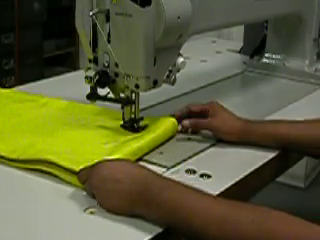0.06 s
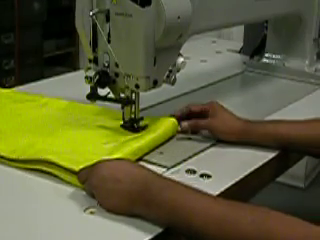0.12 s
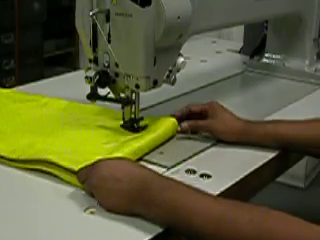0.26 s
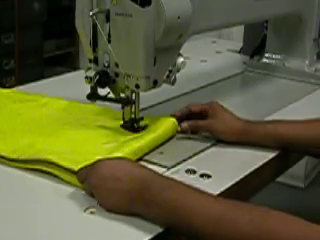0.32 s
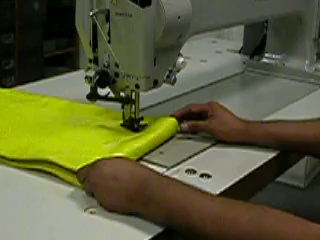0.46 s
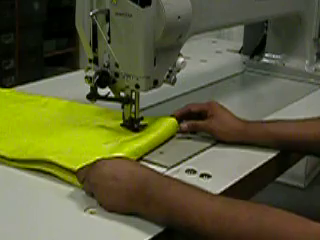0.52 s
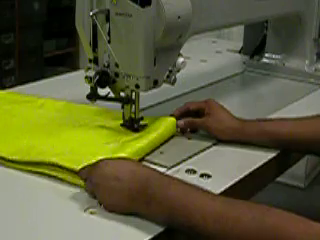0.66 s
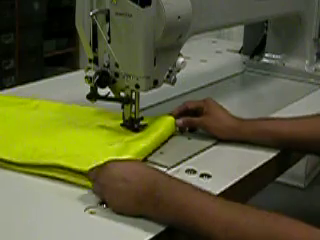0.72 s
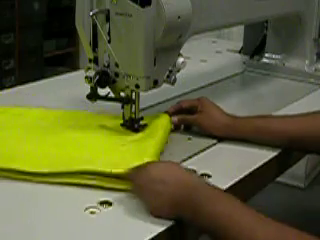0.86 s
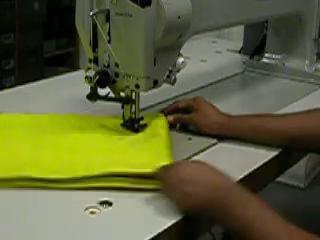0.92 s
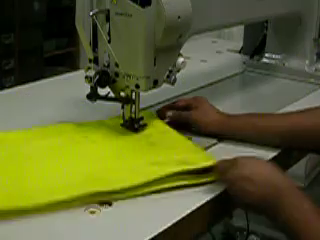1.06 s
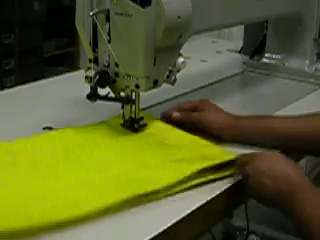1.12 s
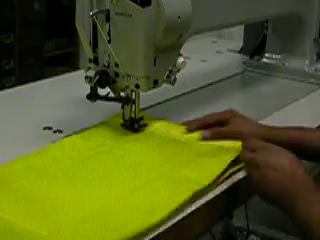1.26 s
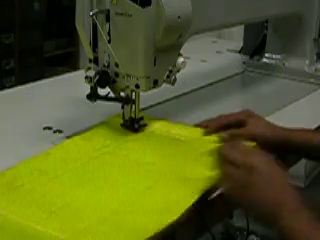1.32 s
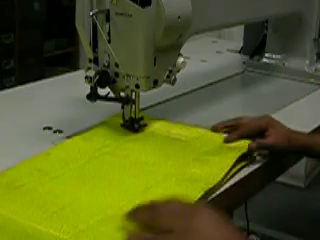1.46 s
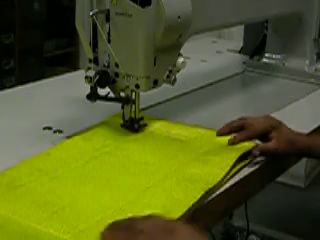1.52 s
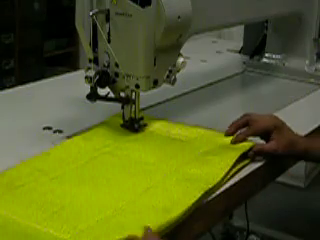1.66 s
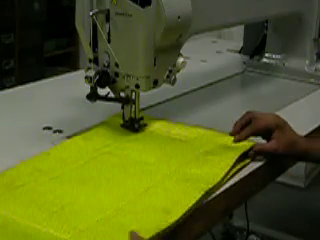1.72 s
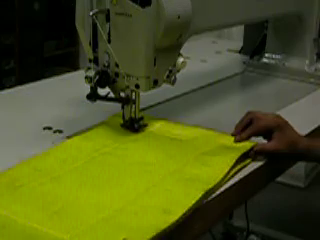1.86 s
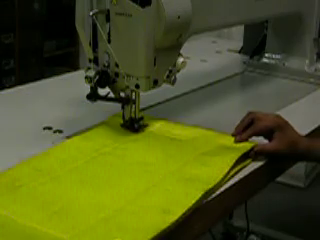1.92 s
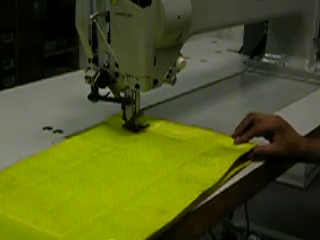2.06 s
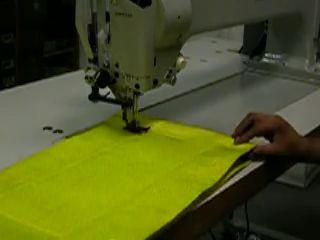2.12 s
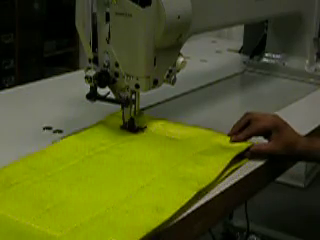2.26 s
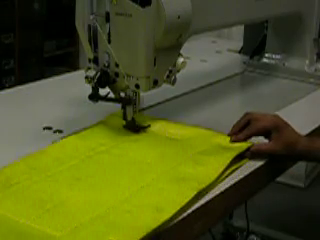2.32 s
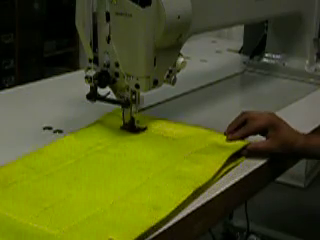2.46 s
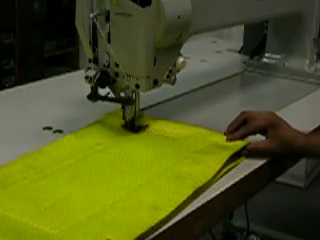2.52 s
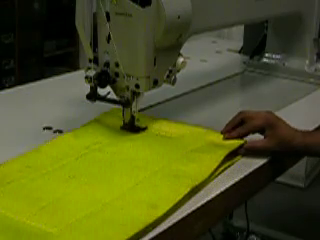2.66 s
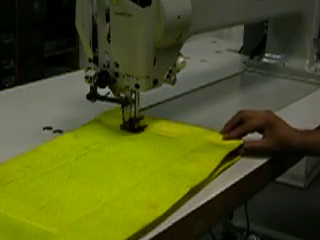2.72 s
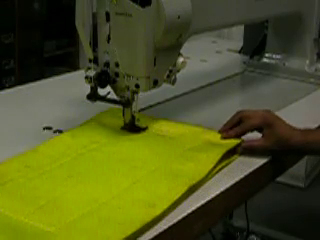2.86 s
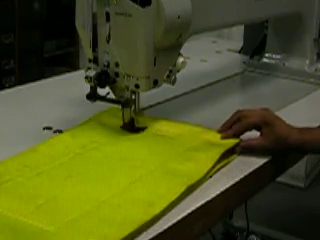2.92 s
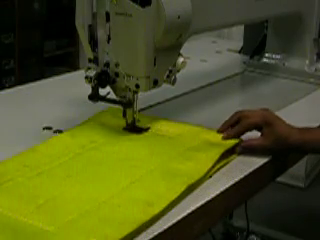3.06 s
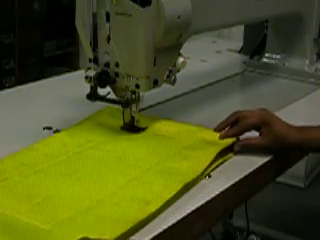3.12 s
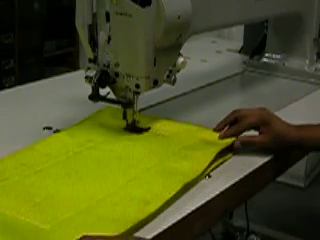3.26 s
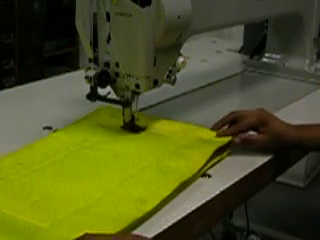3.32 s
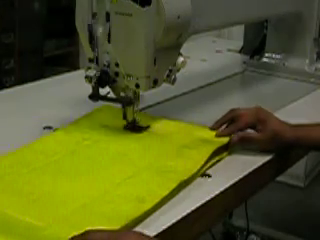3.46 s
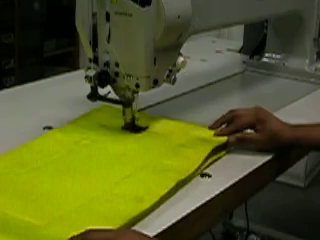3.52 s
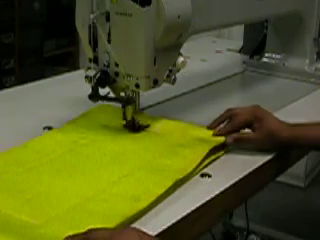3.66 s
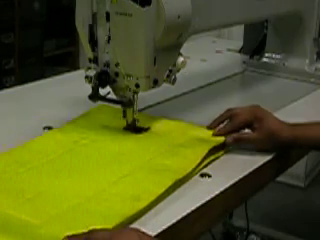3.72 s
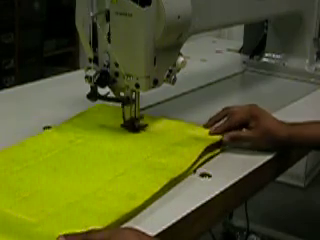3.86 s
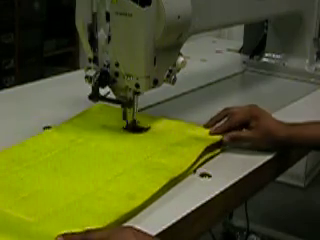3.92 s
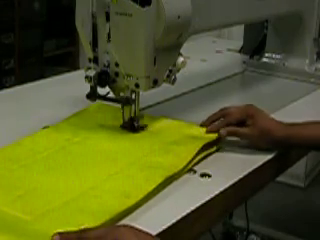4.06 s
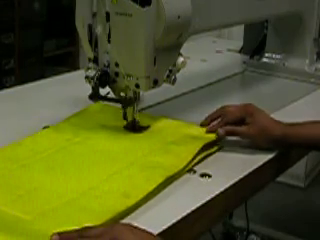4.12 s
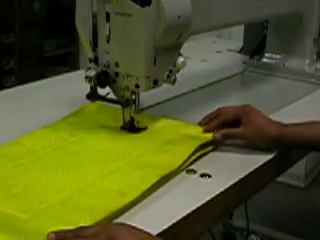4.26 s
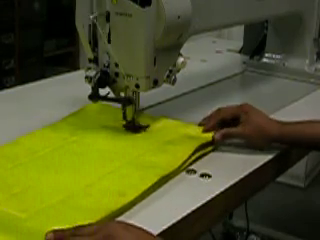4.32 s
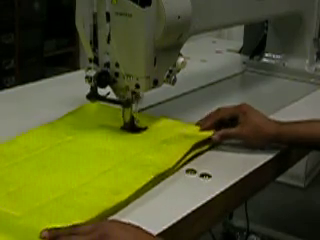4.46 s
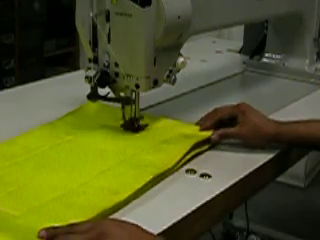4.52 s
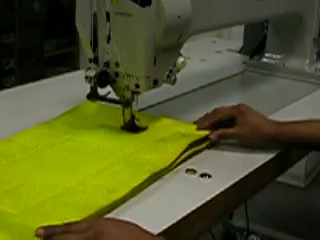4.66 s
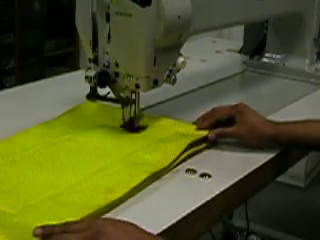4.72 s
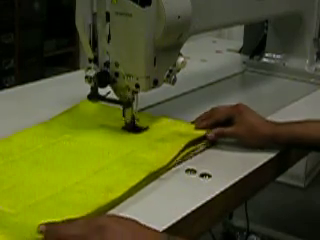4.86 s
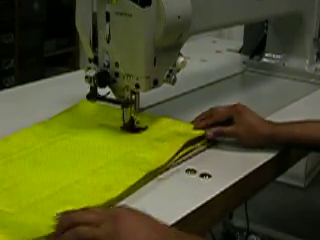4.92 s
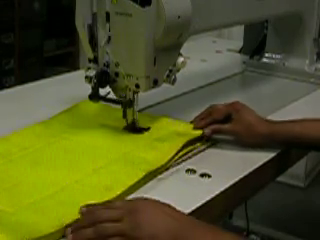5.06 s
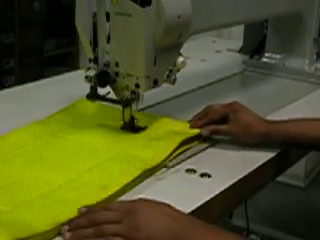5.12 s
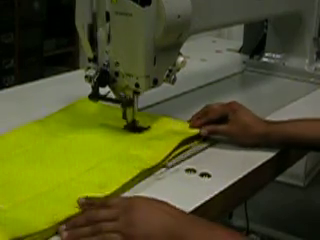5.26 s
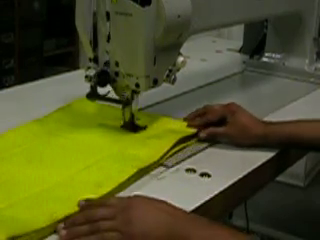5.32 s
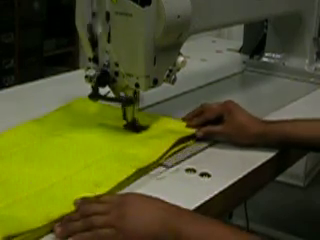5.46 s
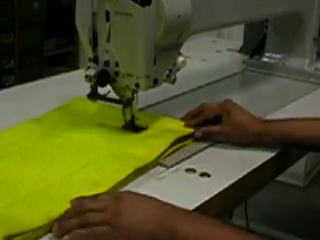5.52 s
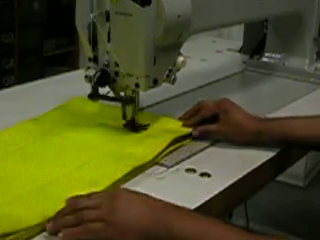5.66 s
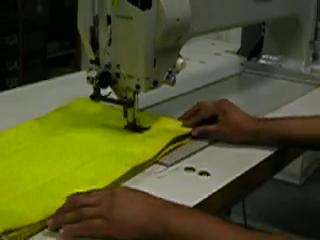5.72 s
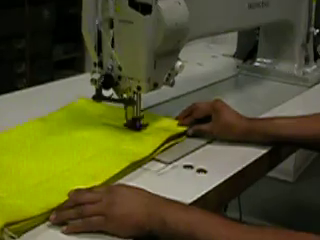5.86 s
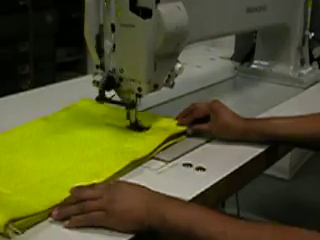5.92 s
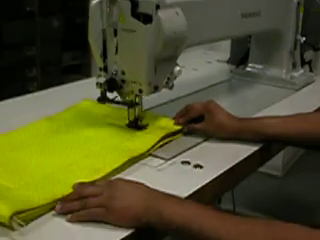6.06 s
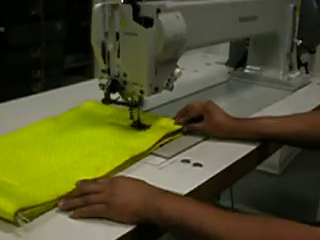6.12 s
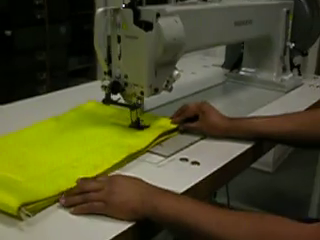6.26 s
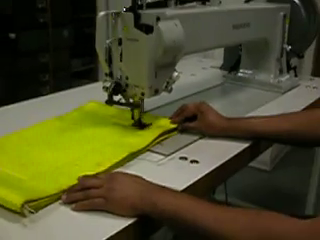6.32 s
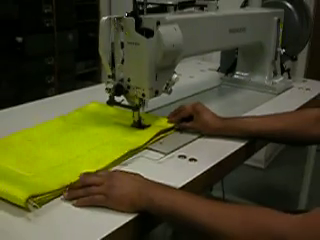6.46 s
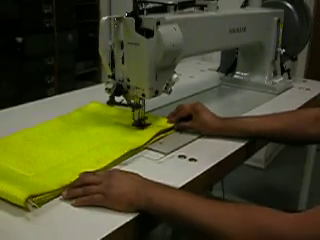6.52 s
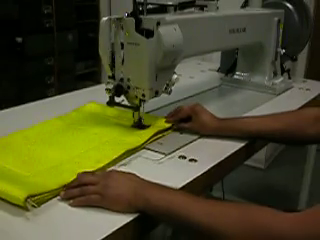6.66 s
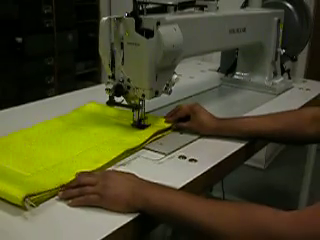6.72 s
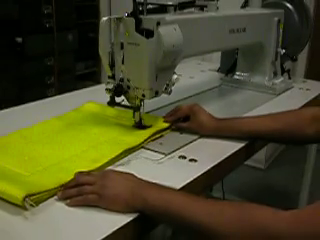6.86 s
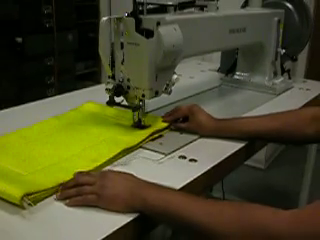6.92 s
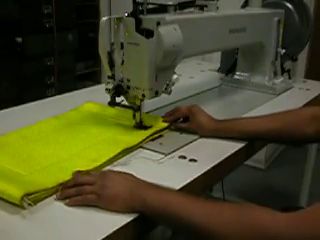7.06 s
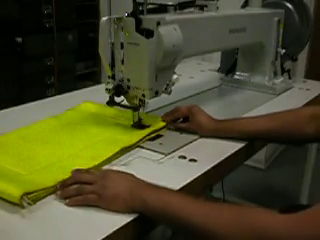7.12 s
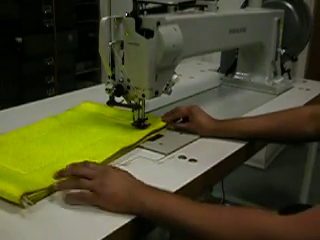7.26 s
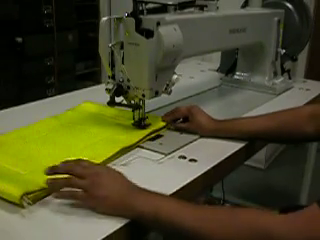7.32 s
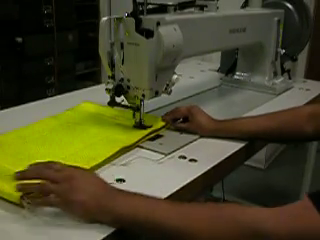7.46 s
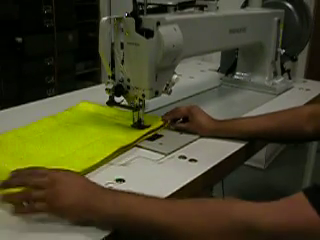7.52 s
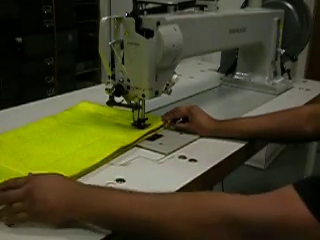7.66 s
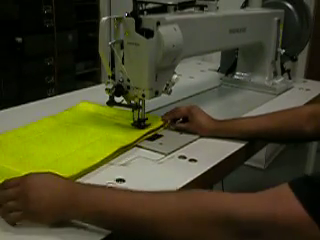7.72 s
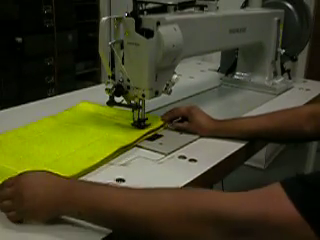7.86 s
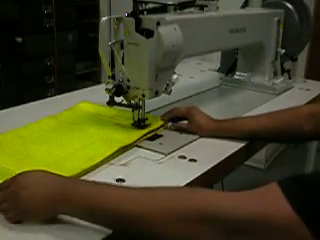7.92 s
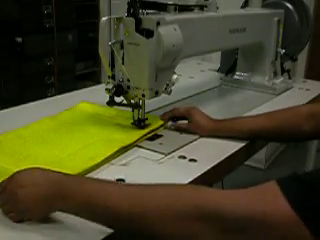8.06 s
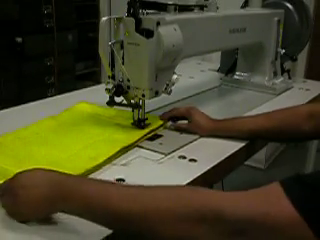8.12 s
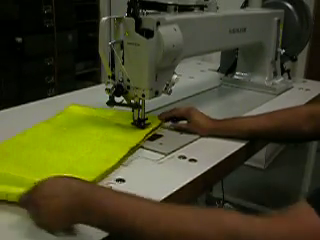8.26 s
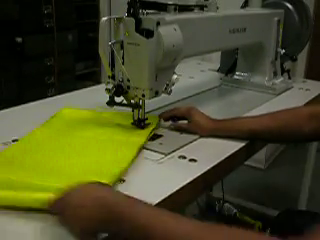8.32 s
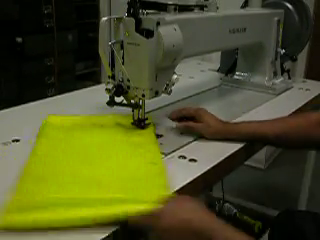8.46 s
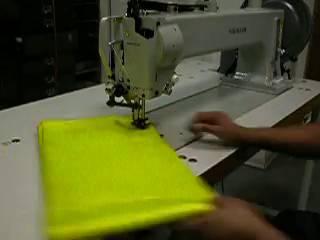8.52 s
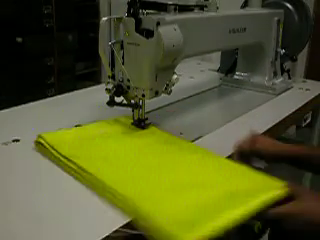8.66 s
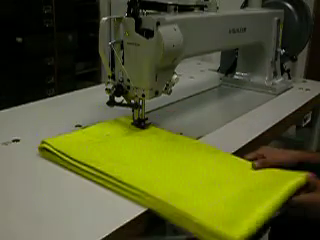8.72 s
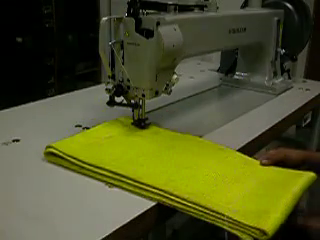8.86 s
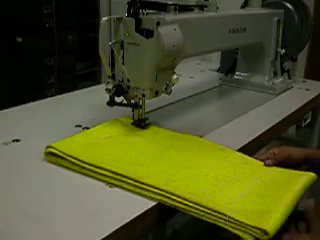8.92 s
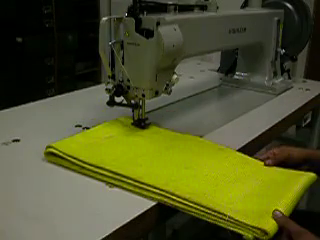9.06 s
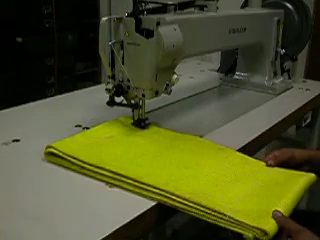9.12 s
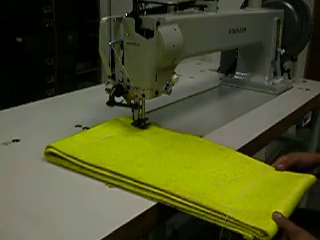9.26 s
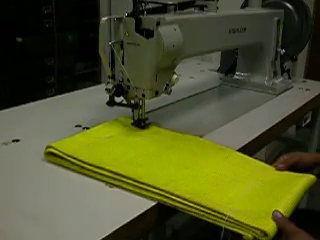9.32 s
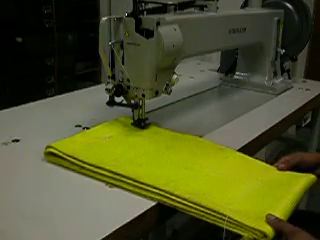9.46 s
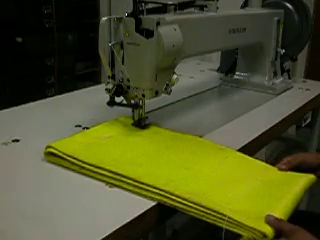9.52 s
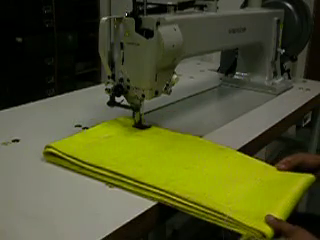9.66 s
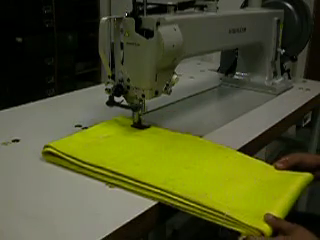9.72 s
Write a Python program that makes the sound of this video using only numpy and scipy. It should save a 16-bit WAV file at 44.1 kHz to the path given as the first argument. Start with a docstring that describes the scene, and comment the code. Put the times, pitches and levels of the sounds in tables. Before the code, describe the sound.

A heavy industrial sewing machine thumps out a steady five-second run of stitches, with air hisses, clunks and paired switch clicks before and after.

```python
"""A heavy walking-foot sewing machine stitches webbing in a workshop, about 4.5 stitches a second.
Each turn stamps the foot (struck modes) and rattles the linkage (noise bursts); gears, hook and thread
are filtered grains. An air cylinder lifts and drops the foot with a hiss (shaped noise) and a clunk.
A small switch clicks in pairs close by, sliding faces squeak, and the motor idles (noise and tones).
A narrow-band microphone channel overloads on the hardest blows."""
import sys
import numpy as np
from scipy import signal
from scipy.fft import rfft, irfft, next_fast_len
from scipy.io import wavfile
from scipy.ndimage import map_coordinates

SR = 44100
rng = np.random.default_rng(int(sys.argv[2]) if len(sys.argv) > 2 else 0)


def to_wav(s):
    """Save 16-bit WAV."""
    ch = np.atleast_2d(s).T  # columns
    pcm = np.round(np.clip(ch, -1, 1) * 32767)  # PCM
    wavfile.write(sys.argv[1], SR, pcm.astype(np.int16))


N = 431282

# Levels in all tables are relative; each source sets its own gain.
# linkage contacts in every turn: place_share_of_turn, thud_db, body_db, crack_db
LINKAGE_CONTACTS = [(.07, -21.5, -15, -25), (.105, -19.5, -20, -26.5), (.28, -22, -31, -30),
                    (.45, -28.5, -21, -28.5), (.71, -28, -21.5, -32.5)]
# stray knocks of the levers and needle bar, and ticks of the air valve just before the lifter moves (0.617 s,
# 9.389 s): start_s, level_db, crack_db
STRAY_KNOCKS = [(0.074, -5.5, -12), (0.162, -4.5, -15), (0.617, -20.5, 0), (0.911, -16, -10),
                (2.213, -17.5, -18), (2.25, -21.5, -9.5), (2.375, -22.5, -9), (2.594, -12.5, -2.5),
                (2.654, -6.5, -5.5), (4.664, -1.5, -6.5), (5.384, -5.5, -13.5), (5.583, -8.5, -7.5),
                (6.466, 1.5, -10), (7.39, -10, -9), (7.663, -12.5, -7.5), (7.94, -3.5, -17),
                (9.389, -8.5, -7)]
# modes of the frame: pitch_hz, level_db, t60_s
FRAME_MODES = [(505.7, -7.5, 0.37), (650, -19, 0.5), (1070, 9, 0.081), (1170, -1.5, .47), (1220, -5, 0.42),
               (1600, -16.5, 0.34), (1760, -14.5, .33), (2340, -17.5, .3), (3480, -14, 0.32),
               (3790, -17, 0.27)]
# spectrum of the switch: pitch_hz, level_db
SWITCH_SPECTRUM = [(180, -47.5), (300, -22), (429, -14), (594, -8.5), (813, -9), (1050, -1), (1560, -10.5),
                   (1850, -8.5), (2070, -9), (2770, -5), (3190, -17), (3750, -10), (4000, -8.5),
                   (5200, -41), (8800, -120)]
# resonances of the switch case: pitch_hz, width_hz, height_db
SWITCH_CASE_PEAKS = [(669, 58, 13.5), (1002, 59, 6), (1202, 74, 8.5), (1790, 84, 9.5), (2670, 320, 4.5)]
# modes of the foot on the needle plate: pitch_hz, level_db, t60_s
FOOT_MODES = [(878.6, 1.5, 0.035), (1029, -12.5, 0.092), (414.7, -18, .13)]
# resonances of the head and table: pitch_hz, width_hz, height_db
HEAD_PEAKS = [(298, 20, 8), (404, 30, 5.5), (506, 30, 7), (647.5, 26, 5), (920, 80, 2), (1046, 60, 3),
              (1160, 47, 1.5), (1976, 120, 5.5), (2420, 22, 1.5), (3350, 29, 6), (3300, 25, 1),
              (3700, 26, 1)]
# gear clatter spectrum: pitch_hz, density_db_per_hz
CLATTER_SPECTRUM = [(25, -22), (100, -17), (160, -8), (230, -10), (330, -5.5), (500, -1.5), (720, -2),
                    (900, 4.5), (1100, -1.5), (1350, -3), (1600, -10.5), (2500, -20.5), (4000, -23)]
# hook whirr spectrum: pitch_hz, density_db_per_hz
WHIRR_SPECTRUM = [(1000, -33), (1650, -4.5), (2000, 1), (2400, 5), (2700, -5), (3000, -15), (4000, -11.5)]
# thread rasp spectrum: pitch_hz, density_db_per_hz
RASP_SPECTRUM = [(1200, -23), (2300, -8.5), (2800, 3.5), (3150, -4), (3600, 0), (4200, -1)]
# low part of a blow: pitch_hz, density_db_per_hz
THUD_SPECTRUM = [(30, -15.5), (150, -15.5), (400, -1.5), (600, -2.5), (1000, -16), (3000, -52)]
# middle part of a blow: pitch_hz, density_db_per_hz
BODY_SPECTRUM = [(300, -37), (700, -17), (1000, -0.5), (1250, -8.5), (1600, -12), (3000, -37)]
# bright part of a blow: pitch_hz, density_db_per_hz
CRACK_SPECTRUM = [(700, -23.5), (1600, -3), (2500, -2), (3300, 1.5), (4200, -3)]
# air jet spectrum: pitch_hz, density_db_per_hz
HISS_SPECTRUM = [(26, -37), (45, -2.5), (144, -8), (273, -3.5), (348, -5), (517, -4), (623, -7.5),
                 (960, -2), (1400, -6.5), (2650, -1), (3130, -4), (3640, -1.5), (4000, 0.5), (5200, -43.5),
                 (8800, -120)]
# idling motor's rush: pitch_hz, density_db_per_hz
IDLE_SPECTRUM = [(30, -4), (110, -6), (200, -0.5), (290, 0), (450, -2), (800, -1.5), (1150, -3.5),
                 (1400, -8), (2200, -7), (3000, -9), (4000, -9.5)]
# idling motor's tones: pitch_hz, level_db
HUM_TONES = [(193.8, -56), (269.2, -54), (689.1, -52.5), (1136, -57.5), (1174, -61), (2132, -68)]
# reverberation of the workshop: pitch_hz, t60_s
WORKSHOP_DECAY = [(150, 0.56), (1000, 0.42), (4000, 0.18)]
# response of the microphone channel: pitch_hz, gain_db
MICROPHONE_RESPONSE = [(3750, 0), (3950, -4), (4100, -9.5), (4300, -20.5), (4500, -45), (4710, -88.5)]
# brief squeaks of the clutch and valve: start_s, pitch_hz, level_db
SQUEAK_NOTES = [(0.643, 1203, -16), (1.811, 3195, -27.5), (2.409, 2014, -27.5), (7.712, 3790, -36.5),
                (7.738, 2065, -36), (8.272, 3300, -27.5), (9.374, 3300, -26)]
# pedal runs: clutch_takes_s, first_stitch_s, brake_bites_s, drive_db, coasting_db_per_s
PEDAL_RUNS = [(0.0, 0.057, 0.179, -16, 224), (2.45, 2.549, 7.544, -18.7, 125),
              (7.761, 7.847, 7.991, -17.5, 330)]
# force of the stamp, following the thickness of the webbing: time_s, peak_db
STAMP_FORCE = [(0, -6.5), (2.55, -9), (3.4, -7), (4.3, -7.5), (5.45, -5), (5.9, -8), (6.8, -7),
               (7.45, -8.5), (7.85, -6)]
# pulls on the thread in each turn: from_share_of_turn, to_share_of_turn, rasp_db
THREAD_PULLS = [(0, 0.281, 1), (.46, 0.559, -3.5), (0.711, .82, -2)]
# the air cylinder raises the foot: valve_cracks_s, opens_s, shuts_s, air_db
FOOT_RAISES = [(0.643, 0.674, 0.82, -15.5), (8.275, 8.285, 8.425, -15.5)]
# it lowers the foot, which rings the frame: valve_cracks_s, opens_s, lands_s, air_db, ring_db
FOOT_DROPS = [(1.809, 1.842, 1.931, -12.5, -27), (9.376, 9.406, 9.494, -13.5, -18)]
# pairs of switch clicks: pressed_s, released_s, press_db, release_db, treble_db_per_octave
SWITCH_PRESSES = [(0.316, 0.379, -6.5, -3, -5), (0.516, 0.58, -3.5, -1.5, 0.5),
                  (2.063, 2.181, -9, -10, 2.5), (8.587, 8.659, -12.5, -11.5, 0),
                  (8.783, 8.866, -11.5, -9.5, -0.5), (8.99, 9.06, -7.5, -9.5, -4),
                  (9.192, 9.261, -0.5, -12, 0), (9.592, 9.667, -8, -8.5, -2.5)]
# thin sagging whines: start_s, length_s, pitch_hz, sag_hz_per_s, level_db
MOTOR_WHINES = [(8.52, .59, 2272, 265, -45.5), (9.29, .14, 2110, 39.8, -42)]

TURN_S = .2226  # one stitch at full speed
SPIN_UP_LAG_S, SPIN_UP_TURNS = .0135, 2.5  # time lost while gathering speed; turns it is spread over
# the noise comes in fast, a little low, then fills out
CLUTCH_DB_PER_S, SOFT_START_DB, SPIN_UP_S = 500.5, 5, 0.32
FIRST_STAMP_DB = -3.5  # in the first turn the foot and links move more slowly
LOAD_RISE = 0.053  # share of a turn in which the load builds before the stamp; it then ebbs
CLATTER_EBB_DB, WHIRR_EBB_DB = 4.5, 5.5  # fall of the load from one stamp to the next
# the feed stroke: place and width in shares of a turn, and the load it adds
FEED_PLACE, FEED_WIDTH, FEED_CLATTER_DB, FEED_WHIRR_DB = 0.46, .12, 1.5, 2
PULL_EDGE, SLACK_THREAD_DB = .08, -11  # fade of a pull (share of turn), rasp between pulls
# blows that come with each raise, drop and stop: level_db, thud_db, crack_db
RAISE_KICK, RAISE_STOP = (0, -13, -16), (-7, -10, -18.5)
DROP_KICK, DROP_LANDING = (-9.5, -7, -14.5), (4.5, -17.5, -10)
VALVE_TICK, BRAKE = (-19.5, -14, -6), (-4.5, -15, -8)
KNOCK_THUD_DB = -22.5
# the air line empties; below this pitch the jet rumbles only while the valve is open
EMPTY_S, PUFF_HZ = .19, 170
TOP_HZ = 15800  # upper limit of the channel after clipping


def amp(db):
    """Logarithmic level: decibels become a pressure ratio."""
    return 10 ** (np.asarray(db) / 20)


def unit(x):
    """Effective value: scale a signal to rms 1."""
    return x / np.sqrt(np.mean(x ** 2) + 1e-20)


def along(points, hz):
    """Logarithmic pitch scale: interpolate (Hz, value) points along it."""
    f, v = np.transpose(points)
    return np.interp(np.log(hz + 1), np.log(f + 1), v)


def clock(size=N):
    """Sampled time: the seconds at each sample."""
    return np.arange(size) / SR


def wobble(rate):
    """Slow random modulation: a smooth curve through rate random knots a second."""
    knots = rng.standard_normal(int(N * rate / SR) + 4)
    return map_coordinates(knots, [clock() * rate])


def add(track, s, sound):
    """Superposition: mix a sound into the track at s seconds."""
    start = int(np.clip(round(s * SR), 0, N))
    track[start:start + len(sound)] += sound[:N - start]


def colour(spectrum, peaks=(), size=8192):
    """Minimum phase: a causal impulse response of energy 1, with resonances on a broad spectrum."""
    hz = np.fft.rfftfreq(size, 1 / SR)
    resonances = sum(g / (1 + (2 * (hz - f) / w) ** 2) for f, w, g in peaks)
    db = along(spectrum, hz) + resonances
    db = np.maximum(db - np.maximum(hz - 4400, 0) / 30, -100)  # steep fall above 4.4 kHz
    # folding the cepstrum onto positive time makes the response causal
    cepstrum = irfft(np.log(amp(db)))
    fold = np.r_[1, np.full(size // 2 - 1, 2), np.zeros(size // 2)]
    h = irfft(np.exp(rfft(cepstrum * fold)))
    return h / np.linalg.norm(h)


def through(x, h):
    """Linear filtering: convolve a signal with an impulse response."""
    return signal.oaconvolve(x, h)[:N]


def grains(rate, scatter_db):
    """Shot noise: tiny random impacts, on average rate a second, at rms 1."""
    present = rng.random(N) < rate / SR
    sign = rng.choice([-1, 1], N)
    return unit(present * sign * amp(scatter_db * rng.uniform(-1, 1, N)))


def blow(h, t60, attack, size=6000):
    """Impact noise: decaying chatter excites a response; the first 10 ms set its scale."""
    t = clock(size)
    chatter = rng.standard_normal(size) * amp(-60 * t / t60) * (1 - np.exp(-t / attack))
    x = signal.fftconvolve(chatter, h)[:size]
    return x / x[:SR // 100].std()


def blow_responses():
    """Modal colouring: thud, body and crack bands, each heard through the head."""
    return [colour(band, HEAD_PEAKS) for band in (THUD_SPECTRUM, BODY_SPECTRUM, CRACK_SPECTRUM)]


def ring(modes, attack, scatter_db, detune, size=SR // 2):
    """Modal vibration: decaying sines, with strengths and pitches scattered anew for each blow."""
    t = clock(size)
    partials = np.zeros(size)
    for hz, db, t60 in modes:
        decay = amp(db + scatter_db * rng.normal() - 60 * t / t60)
        partials += decay * np.sin(2 * np.pi * hz * (1 + detune * rng.normal()) * t)
    return partials * (1 - np.exp(-t / attack))


def turns(first, brake):
    """Rotational inertia: stitch times settle to a steady beat as the shaft gathers speed."""
    k = np.arange(int((brake - first) / TURN_S) + 1)
    return first + k * TURN_S + SPIN_UP_LAG_S * (1 - np.exp(-k / SPIN_UP_TURNS))


def shaft():
    """Driven rotation: gain and place in the turn (0-1) as each run catches, fills out and coasts down."""
    t, drive, share = clock(), np.zeros(N), np.zeros(N)
    for clutch, first, brake, db, coast in PEDAL_RUNS:
        catch_db = CLUTCH_DB_PER_S * np.minimum(t - clutch, 0)
        soft_db = SOFT_START_DB * np.exp(-np.maximum(t - clutch, 0) / SPIN_UP_S)
        drive += amp(db + catch_db - soft_db - coast * np.maximum(t - brake, 0))
        stamps = turns(first, brake)
        marks = np.r_[first - TURN_S, stamps, stamps[-1] + TURN_S]
        share += np.interp(t, marks, np.arange(len(marks)))
    return drive, share % 1


def thread_rasp_db(share):
    """Friction under tension: the rasp rises with each pull, and the strongest pull counts."""
    pulls = []
    for start, end, db in THREAD_PULLS:
        places = [start - PULL_EDGE, start, end, end + PULL_EDGE]
        levels = [SLACK_THREAD_DB, db, db, SLACK_THREAD_DB]
        pulls.append(np.interp(share, places, levels, period=1))
    return np.max(pulls, axis=0)


def mechanism():
    """Load-modulated contact noise: gears and hook peak at stamp and feed; thread rasps when pulled."""
    drive, share = shaft()
    load = np.maximum(1 - share / (1 - LOAD_RISE), 1 - (1 - share) / LOAD_RISE) - .5
    feed = np.exp(-((share - FEED_PLACE) / FEED_WIDTH) ** 2)
    clatter_db = CLATTER_EBB_DB * load + FEED_CLATTER_DB * feed - 4.0
    whirr_db = WHIRR_EBB_DB * load + FEED_WHIRR_DB * feed - 8.0
    rasp_db = thread_rasp_db(share) - 11.0
    clatter_gain = amp(clatter_db + .9 * wobble(45))
    clatter = clatter_gain * through(grains(1200, scatter_db=2.5), colour(CLATTER_SPECTRUM, HEAD_PEAKS))
    whirr_gain = amp(whirr_db + .9 * wobble(35))
    whirr = whirr_gain * through(grains(2500, scatter_db=6.5), colour(WHIRR_SPECTRUM, HEAD_PEAKS))
    rasp_gain = amp(rasp_db + 1.8 * wobble(30))
    rasp = rasp_gain * through(grains(900, scatter_db=2.0), colour(RASP_SPECTRUM, HEAD_PEAKS))
    return drive * (clatter + whirr + rasp)


def motor():
    """Broadband and tonal radiation: a soft rush, faint tones and a thin whine that sags in pitch."""
    t = clock()
    rush_gain = amp(-42.0 + 0.39 * wobble(17))
    rush = rush_gain * through(rng.standard_normal(N), colour(IDLE_SPECTRUM))
    hum = np.zeros(N)
    for hz, db in HUM_TONES:
        hum += amp(db - 1.5 + 2.5 * wobble(5)) * np.sin(2 * np.pi * hz * t + 2.5 * wobble(13))
    whine, flutter = np.zeros(N), .4 * wobble(60)  # flutter in radians
    for s, length, hz, sag, db in MOTOR_WHINES:
        age = clock(int(length * SR))
        phase = 2 * np.pi * np.cumsum(hz - sag * age) / SR + flutter[:len(age)]
        add(whine, s, amp(db) * signal.windows.tukey(len(age), .45) * np.sin(phase))
    return rush + hum + whine


def stitches():
    """Periodic impact: the foot stamps once a turn; links take up their play at set places in it."""
    out = np.zeros(N)
    responses = blow_responses()
    _, body, crack = responses
    for _, first, brake, _, _ in PEDAL_RUNS:
        for k, s in enumerate(turns(first, brake)):
            slow_db = FIRST_STAMP_DB * (k == 0)
            db = np.interp(s, *np.transpose(STAMP_FORCE)) + slow_db
            stamp = ring(FOOT_MODES, attack=.0025, scatter_db=.8, detune=.028)
            add(out, s - .002, amp(db + 7.5) * stamp)
            add(out, s - .003, amp(db - 14.0 + rng.normal()) * blow(crack, t60=0.088, attack=0.0011))
            add(out, s, amp(db - 18.5) * blow(body, t60=.05, attack=0.00052))
            for share, *levels in LINKAGE_CONTACTS:
                contact = 0
                for level, h in zip(levels, responses):
                    gain = amp(level - 5.5 + 2 * rng.normal())
                    contact = contact + gain * blow(h, t60=0.031, attack=0.00061)
                when = s + share * TURN_S + .001 * rng.normal()
                add(out, when, (when < brake) * amp(slow_db) * contact)  # silent once the brake bites
    return out


def knocks():
    """Arrested motion: lifter, brake and levers strike their stops; a landing foot rings the frame."""
    out = np.zeros(N)
    thud, body, crack = blow_responses()
    hits = [(brake, *BRAKE) for _, _, brake, _, _ in PEDAL_RUNS]
    lifter = ((FOOT_RAISES, RAISE_KICK, RAISE_STOP), (FOOT_DROPS, DROP_KICK, DROP_LANDING))
    for moves, kick, stop in lifter:
        for cracks, opens, ends, *_ in moves:
            hits += [(cracks, *VALVE_TICK), (opens, *kick), (ends, *stop)]
    hits += [(s, db, KNOCK_THUD_DB, crack_db) for s, db, crack_db in STRAY_KNOCKS]
    for s, db, thud_db, crack_db in hits:
        add(out, s, amp(db - 12.5) * blow(body, t60=.055, attack=.001))
        add(out, s, amp(db + thud_db - 6) * blow(thud, t60=0.098, attack=0.0018))
        add(out, s, amp(db + crack_db - 9.5) * blow(crack, t60=0.045, attack=0.00038))
    for _, _, lands, _, ring_db in FOOT_DROPS:
        add(out, lands, amp(ring_db) * ring(FRAME_MODES, attack=0.0017, scatter_db=1.5, detune=.002))
    return out


def switch():
    """Snap action: the spring creaks over, snaps and chatters in its resonant plastic case."""
    out, t = np.zeros(N), clock(size=2000)
    lead = .008  # seconds of creak before the snap
    for pressed, released, press_db, release_db, treble_db in SWITCH_PRESSES:
        # the treble tilt spans one octave from 1400 Hz, then stays level
        tilted = [(hz, level + treble_db * np.clip(np.log2(hz / 1400), 0, 1))
                  for hz, level in SWITCH_SPECTRUM]
        case = colour(tilted, SWITCH_CASE_PEAKS)
        for s, db in ((pressed, press_db), (released, release_db)):
            chatter_db = np.where(t < lead, 2200 * (t - lead) - 3, -1450 * (t - lead))
            chatter = rng.standard_normal(len(t)) * amp(chatter_db)
            snap = amp(20) * signal.unit_impulse(len(t), round(lead * SR))
            click = signal.fftconvolve(chatter + snap, case)
            add(out, s - lead + 0.00082, amp(db + 13.0) * click / np.linalg.norm(click))
    return out


def air():
    """Turbulent jet noise: the valve leaks, the piston thumps, air blows, then the line empties thinly."""
    t, flow, valve, piston = clock(), np.zeros(N), np.zeros(N), np.zeros(N)
    rise = .005  # seconds
    levels_db = [-50, -17.5, -10, 0, -1.5, -60]  # leak starts, leaks, leaks more, open, held, empty
    for cracks, opens, shuts, db, *_ in FOOT_RAISES + FOOT_DROPS:
        times = [cracks - rise, cracks, opens - rise, opens, shuts + rise, shuts + EMPTY_S]
        flow += amp(db + np.interp(t, times, levels_db, left=-120, right=-120))
        valve += np.interp(t, [cracks, opens, shuts - rise, shuts + rise], [0, 1, 1, 0])
        thump = blow(colour(THUD_SPECTRUM), t60=0.087, attack=0.0027)
        add(piston, opens - rise / 2, amp(-17.5) * thump)
    # the grains are the rattle of the lifter in the jet
    jet = unit(rng.standard_normal(N) + .5 * grains(700, scatter_db=6))
    full = through(jet, colour(HISS_SPECTRUM))
    highpass = signal.butter(2, PUFF_HZ, "high", fs=SR, output="sos")
    thin = signal.sosfiltfilt(highpass, full)
    return piston + flow * amp(1.4 * wobble(90)) * (thin + valve * (full - thin))


def squeaks():
    """Stick-slip friction: sliding faces catch for a moment and sing one rough note."""
    out = np.zeros(N)
    t = clock(size=900)
    swell = signal.windows.tukey(len(t), .25) * amp(-250 * t)
    for s, hz, db in SQUEAK_NOTES:
        slip = np.cumsum(rng.standard_normal(len(t))) * .1  # random walk of the phase
        add(out, s - .002, amp(db + 2.5) * swell * np.sin(2 * np.pi * hz * t + slip))
    return out


def workshop(x):
    """Reverberation: a delayed noise tail answers the sound, its treble dying first."""
    hz, t, z = signal.stft(rng.standard_normal(SR // 2), SR, nperseg=256)
    decay = amp(-60 * t / along(WORKSHOP_DECAY, hz)[:, None])
    tail = signal.istft(z * decay, SR, nperseg=256)[1]
    return through(x, np.r_[np.zeros(SR // 200), tail / np.linalg.norm(tail)])  # 5 ms delay


def scene():
    """Direct and reverberant field: the machine fills the room; the near switch is almost dry."""
    machine = mechanism() + stitches() + knocks() + air() + squeaks()
    clicks = switch()
    room = workshop(amp(-11) * machine + amp(-33.5) * clicks)
    return (machine + clicks + room + motor())[None]


def record(dry):
    """Saturation: a preamp rounds hard blows; a narrow voice-band channel, off zero, clips the peaks."""
    rounded = dry / (1 + np.abs(dry / .76) ** 6) ** (1 / 6)
    size = next_fast_len(N + SR // 2)
    hz = np.fft.rfftfreq(size, 1 / SR)
    narrow = irfft(rfft(rounded, size) * amp(along(MICROPHONE_RESPONSE, hz)), size)
    clipped = np.clip(narrow, -.7, .76) - .0466  # uneven limits and a constant offset
    return irfft(rfft(clipped) * (hz < TOP_HZ), size)[:, :N]


dry = scene()
out = record(dry)
to_wav(out)
```